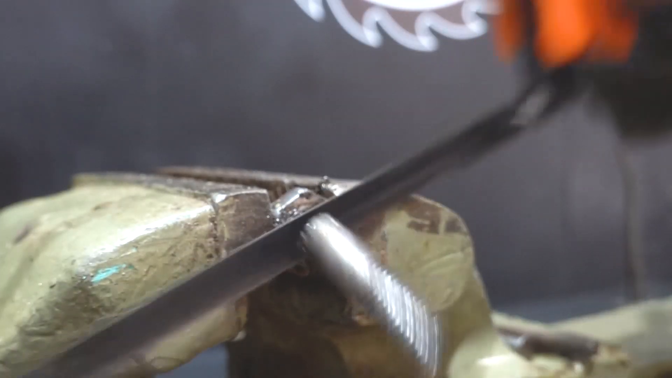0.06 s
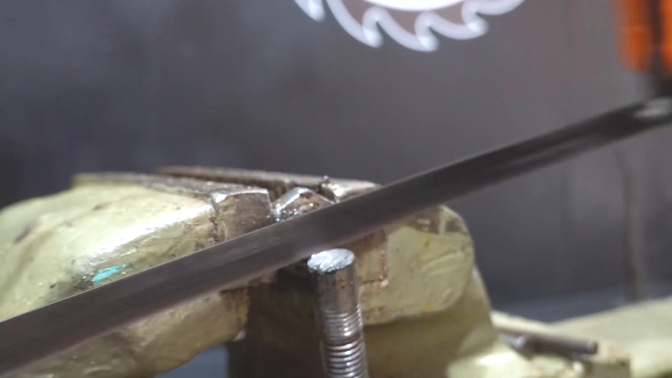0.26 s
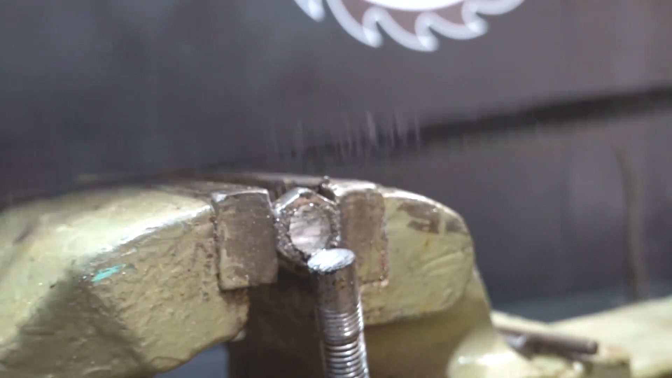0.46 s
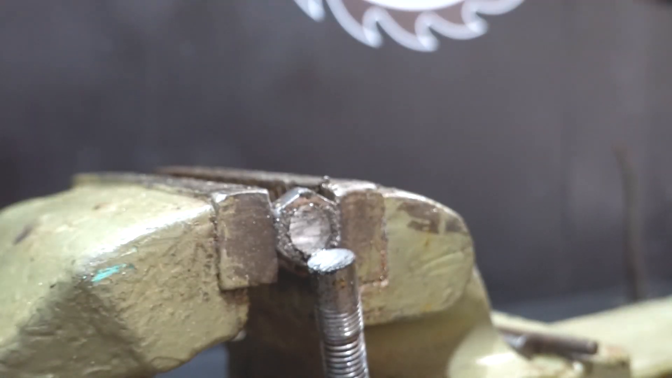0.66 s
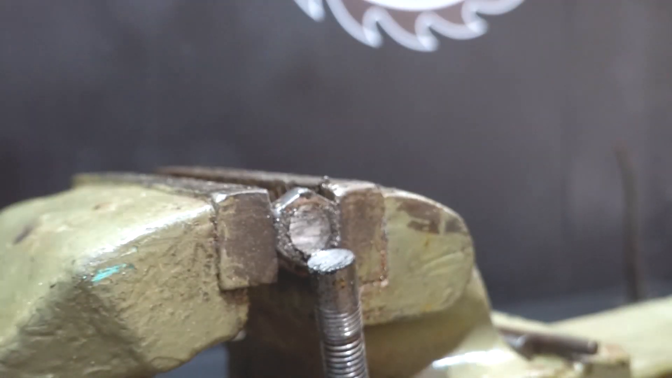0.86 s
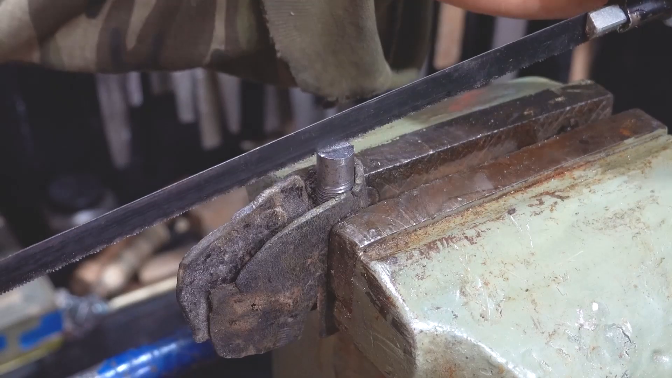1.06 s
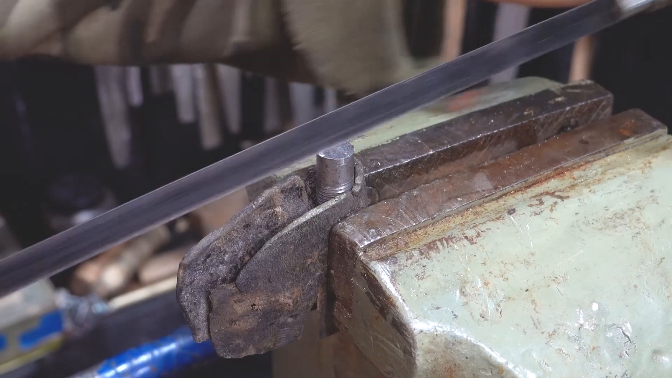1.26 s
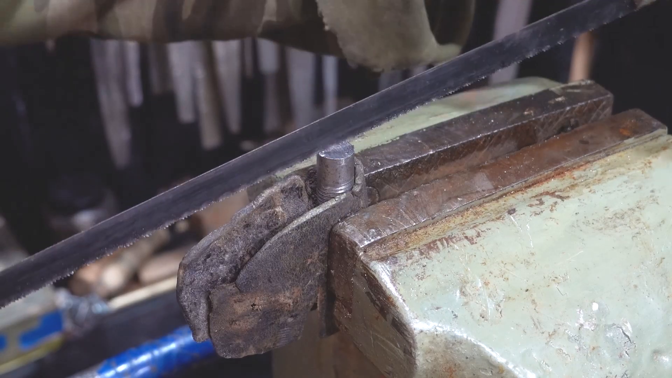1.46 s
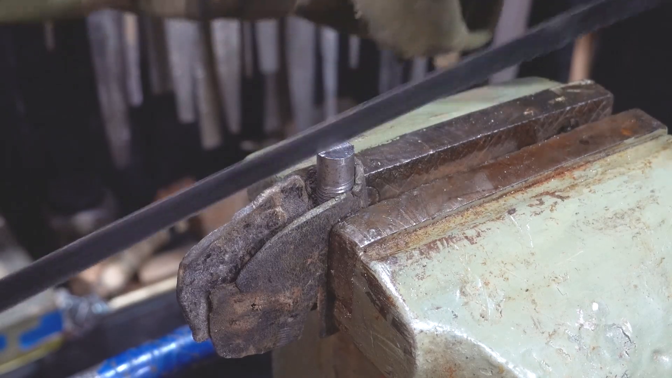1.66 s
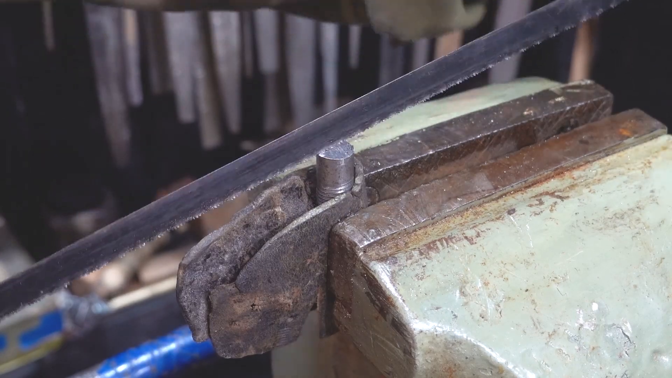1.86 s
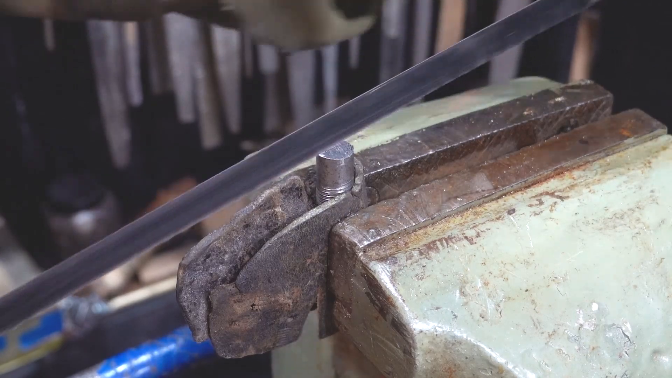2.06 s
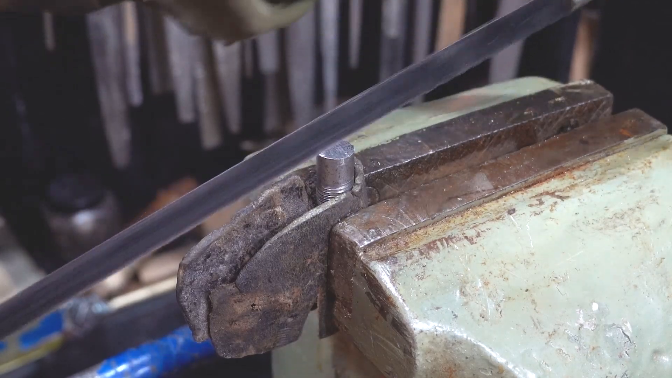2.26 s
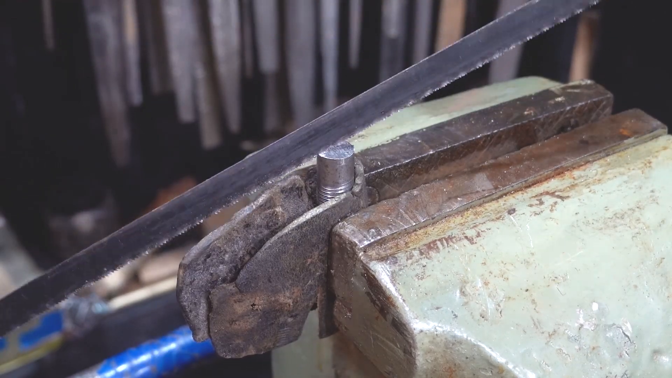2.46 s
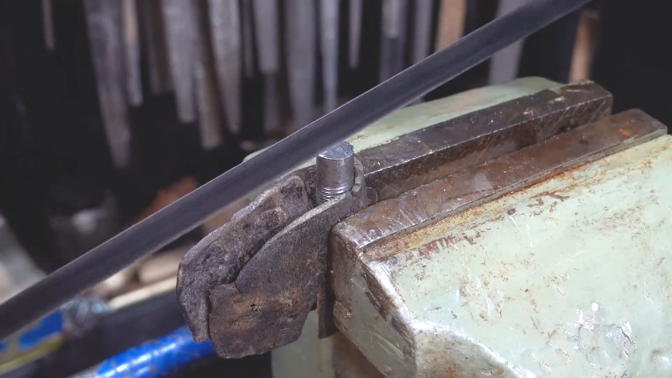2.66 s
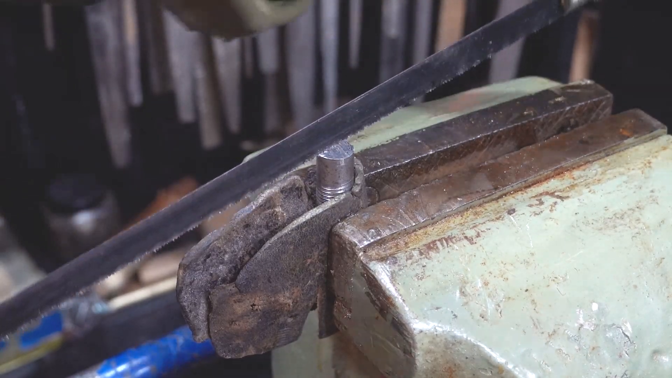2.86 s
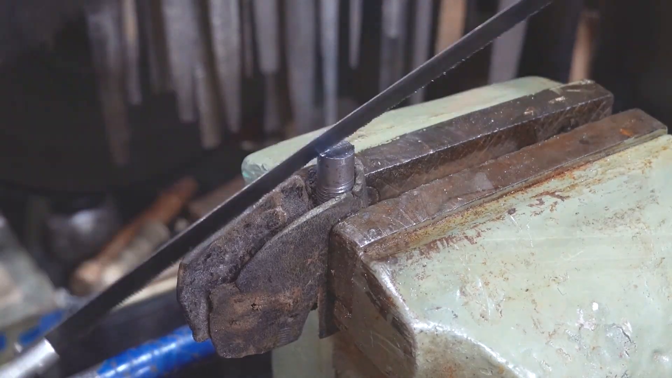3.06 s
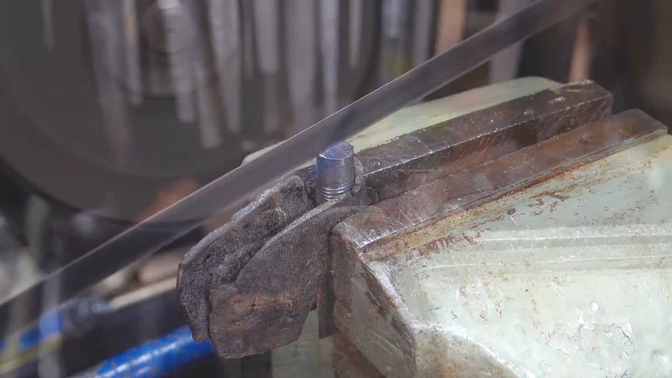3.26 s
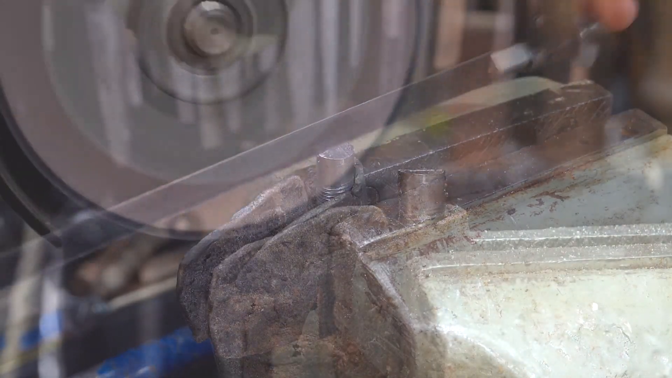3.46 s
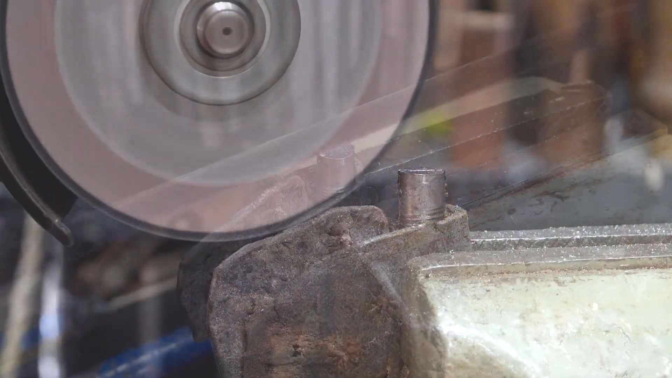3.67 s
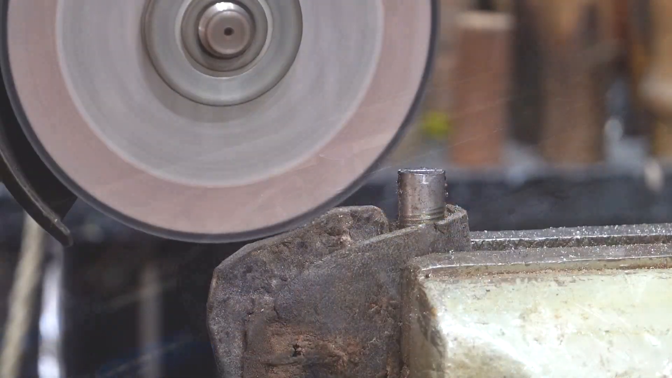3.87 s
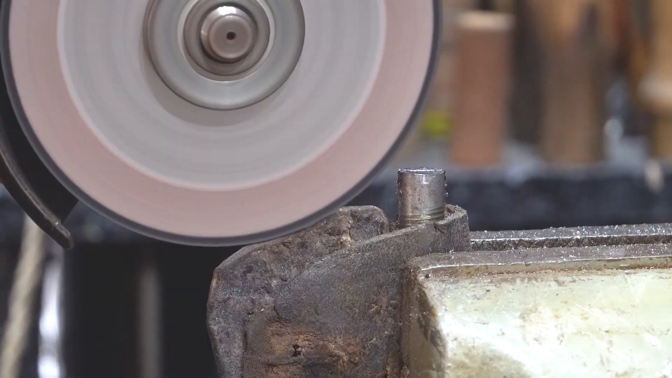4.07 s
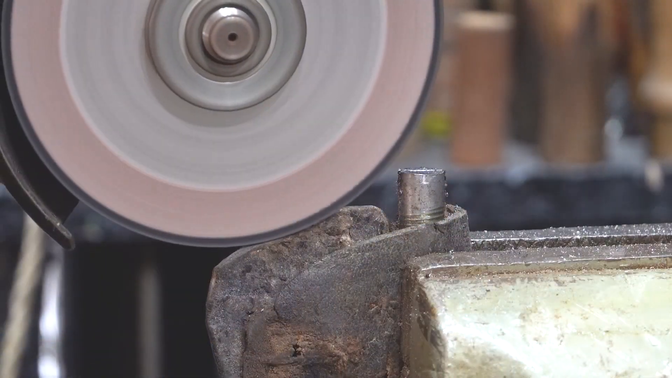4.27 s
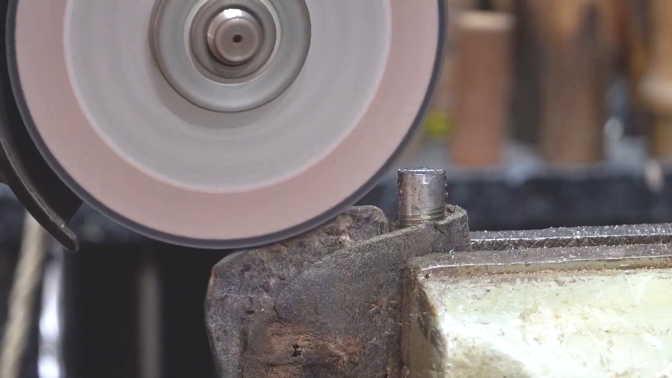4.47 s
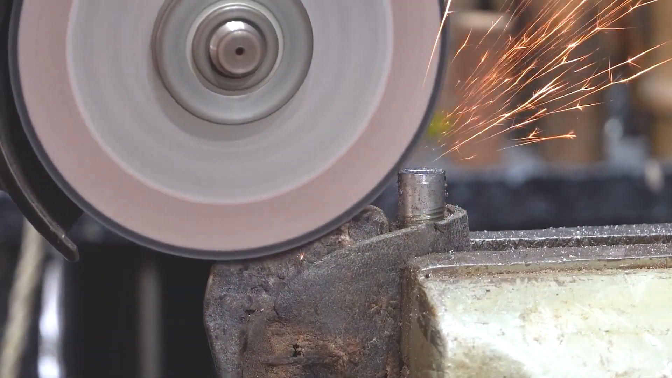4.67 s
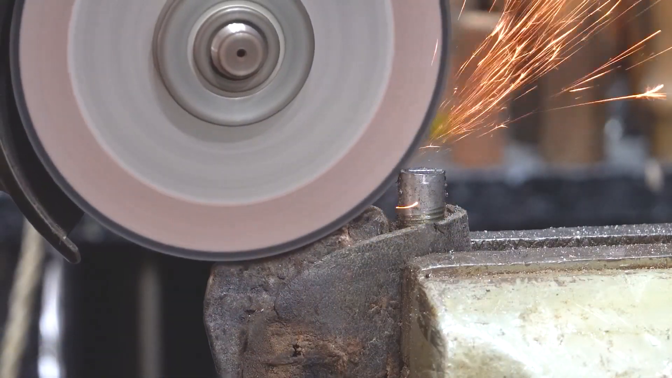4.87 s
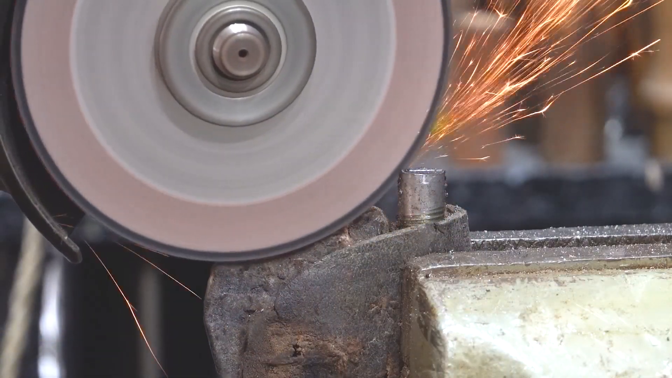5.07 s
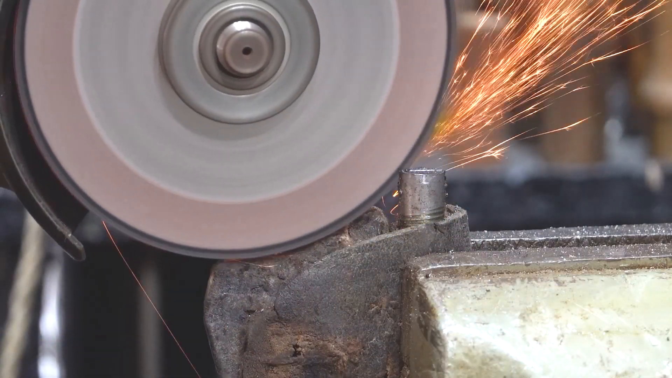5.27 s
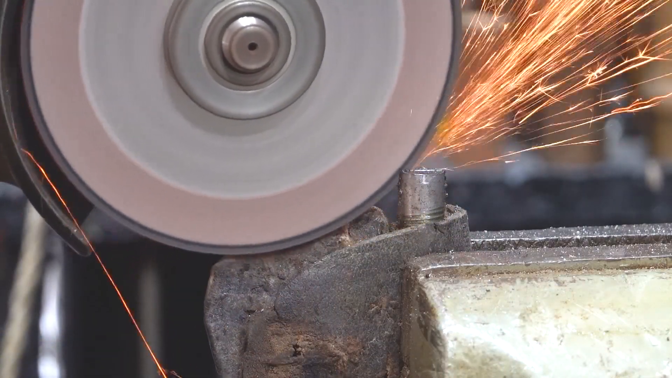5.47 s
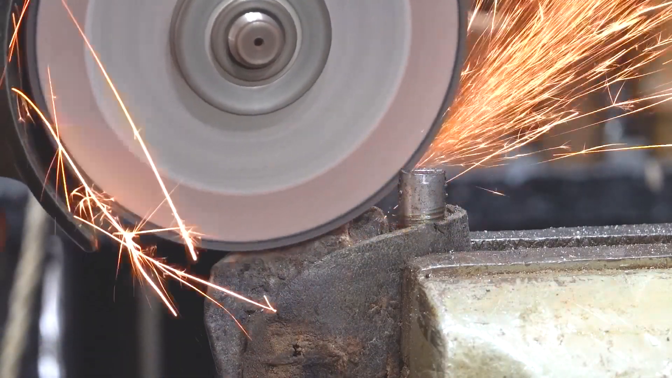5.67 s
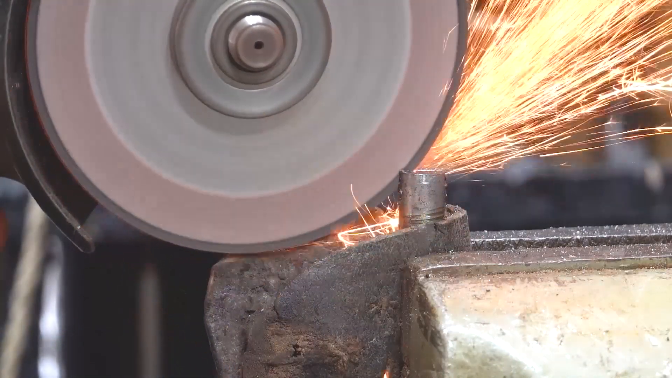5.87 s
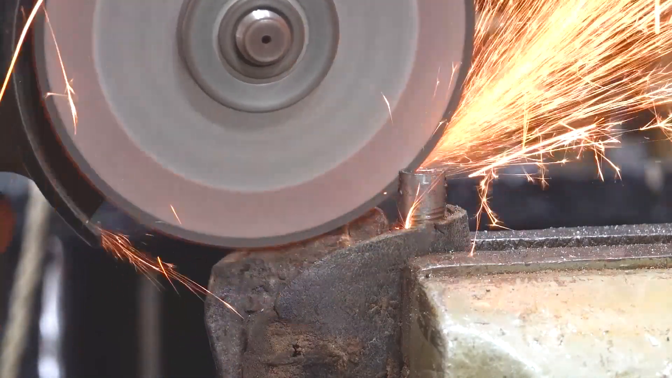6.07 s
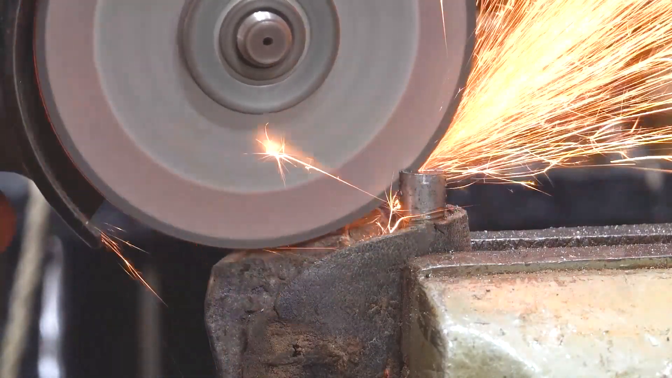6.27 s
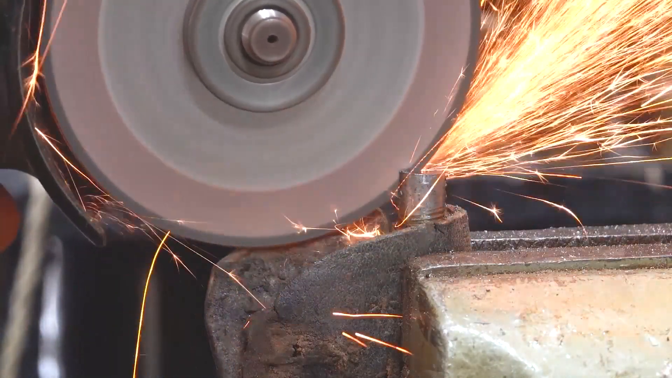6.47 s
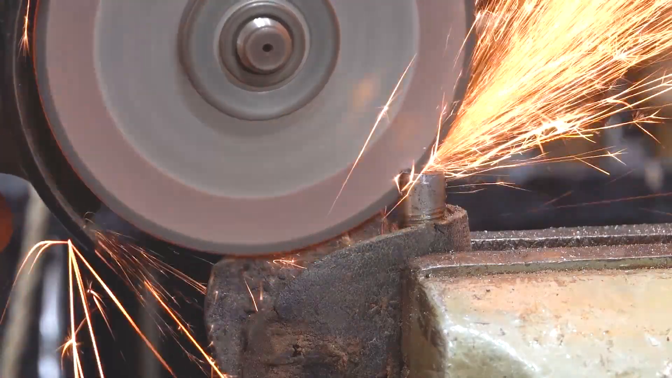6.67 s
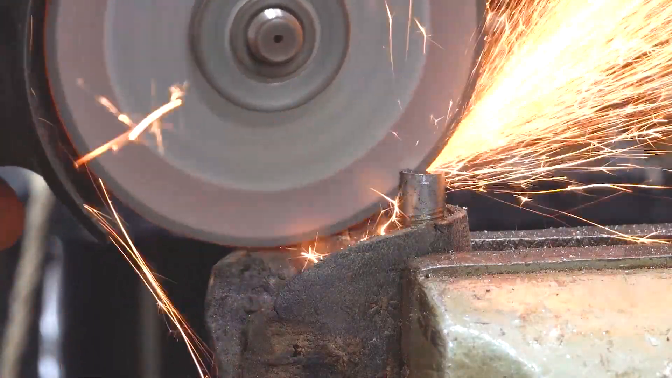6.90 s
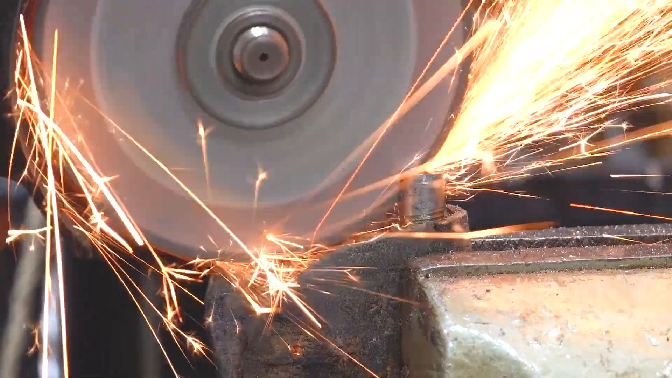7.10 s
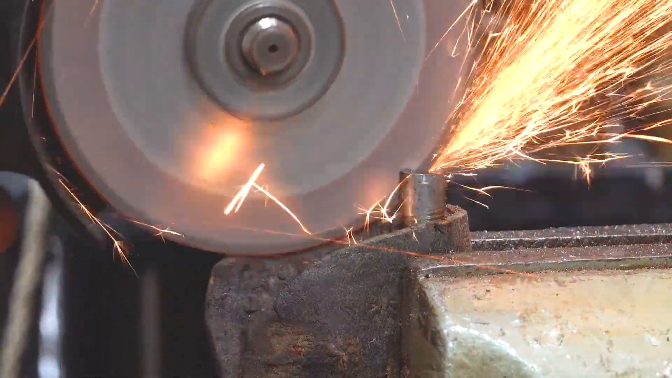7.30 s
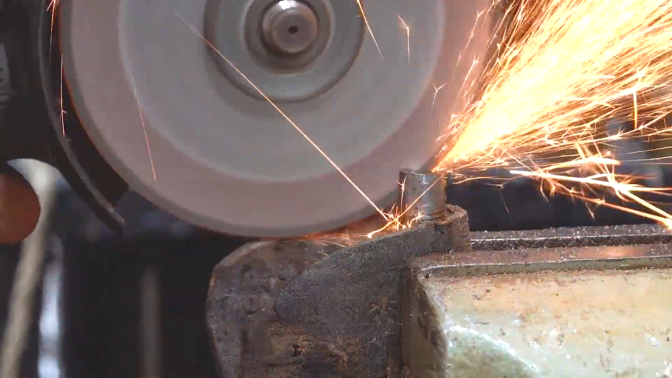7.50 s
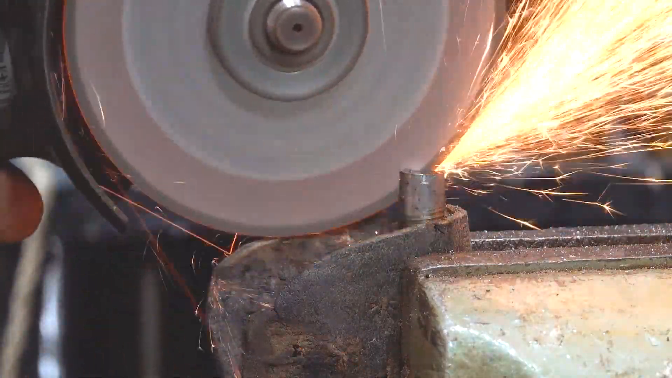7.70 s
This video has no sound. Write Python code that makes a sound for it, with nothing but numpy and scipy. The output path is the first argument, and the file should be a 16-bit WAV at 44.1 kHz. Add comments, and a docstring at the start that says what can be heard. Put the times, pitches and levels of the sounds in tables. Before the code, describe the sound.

Coarse hacksaw rasps finish one steel rod, quieter scraping strokes start another, then an angle grinder whirs and bites into steel with a harsh ringing screech.

```python
"""In a small workshop, close to the vice: a hacksaw finishes a steel rod, then starts on a second, shorter one.
Each stroke is a train of random tooth impacts that rings the modes of rod and vice; snags are single clicks.
An angle grinder takes over: motor tones and fan roar running free, then it bites into the steel, slows under
load and sings on multiples of its disc speed. Behind lie a low bench rumble, reverberation and still air."""
import sys
import numpy as np
from scipy import signal
from scipy.fft import rfft, irfft, next_fast_len
from scipy.io import wavfile
from scipy.ndimage import map_coordinates

SR = 44100
rng = np.random.default_rng(int(sys.argv[2]) if len(sys.argv) > 2 else 0)


def master(y):
    """Save y as 16-bit WAV."""
    cut = np.clip(np.atleast_2d(y).T, -1, 1)
    pcm = np.round(cut * 32767)  # scale
    wavfile.write(sys.argv[1], SR, pcm.astype(np.int16))


N = 341334

# In spectra and resonances level_db is relative: the shaped sound is brought to rms 1 afterwards.
# saw, teeth snagging and the frame knocking: start_s, level_db [dB, peak of the click], treble_db [dB, relative]
SNAG_CLICKS = [(0.2109, -40, -6), (0.2374, -27, -12), (0.2954, -38, -21), (0.4409, -47.5, -12),
               (0.621, -36.5, -17), (1.274, -50.5, -23), (1.293, -38, -32), (1.3149, -36, -31),
               (1.5773, -37.5, -15), (1.6921, -44.5, -15), (1.729, -35, -7.5), (1.8971, -62, -42),
               (1.9704, -40, -17), (2.0009, -27.5, -34), (2.0243, -27, -21), (2.0484, -29.5, -16),
               (2.1001, -41, -9), (2.3004, -56, -12), (2.3184, -59, -17), (2.3401, -29.5, -14),
               (2.6319, -45, -9), (2.6833, -41, -1), (2.7018, -39, -10), (2.9287, -42, -32),
               (2.9786, -49, -9), (3.0078, -33, -31), (3.242, -40.5, -3), (3.2695, -41, -18),
               (3.3119, -33, -16), (3.3373, -31, -10)]
# saw strokes on the long rod: start_s, level_s, release_s [s], start_db, level_db, release_db [dB],
# high_modes_db, treble_db [dB, relative]
LONG_ROD_STROKES = [(0, .075, .14, -36.5, -38, -43.5, -7, -9.5), (.21, .28, 0.34, -50, -39.5, -40, -10, -5),
                    (.36, .385, .41, -52, -50, -57, -5, -2), (.44, .455, .484, -67, -66.5, -71, -5.5, 7)]
# saw strokes on the short rod: the same columns, then vice_db, bench_db [dB, relative];
# release may come before the level point
SHORT_ROD_STROKES = [(1.268, 1.314, 1.37, -70, -53, -60, -2.5, -12.5, -4, -6.5),
                     (1.57, 1.581, 1.65, -61.5, -56.5, -81.5, -2, -15.5, -2.5, -17),
                     (1.682, 1.741, 1.732, -77, -45.5, -52, 0.5, -5.5, -2.5, -19),
                     (1.97, 2.002, 2.18, -66.5, -55.5, -64, 3.5, -6, -4.5, -9.5),
                     (2.312, 2.372, 2.465, -63, -44, -52, -2, -9, -6, -12.5),
                     (2.604, 2.644, 2.63, -74, -63, -68, -1, -5, -8, -6),
                     (2.68, 2.74, 2.818, -58, -51, -54, 3.5, -3, -8, -16),
                     (2.975, 3.042, 3.08, -53.5, -43.5, -46, -2, -7.5, -10, -26),
                     (3.306, 3.405, 3.494, -51.5, -47, -51, 1.5, -7.5, -17, -35)]
# what lingers after a stroke, rows for low modes, high modes, treble: under_release_db [dB], slope [dB per s]
LONG_ROD_TAILS = [(-13, -72), (-9, -74), (-26.5, -140)]
# the same, rows for low modes, high modes, treble, vice: under_release_db [dB], slope [dB per s]
SHORT_ROD_TAILS = [(-8.5, -75), (-12.5, -68), (-15.5, -80), (-9, -83)]
# modes of the long rod: pitch_hz [Hz], width_hz [Hz], level_db [dB]
LONG_ROD_MODES = [(510, 18, -26), (755, 45, -15), (1390, 26, -2.5), (1706, 63, 6), (1866, 300, -1),
                  (2010, 92, 1), (2635, 88, -12.5), (2923, 46, -0.5), (3370, 57, -11), (4380, 38, -12.5)]
# treble modes of the long rod: pitch_hz [Hz], width_hz [Hz], level_db [dB]
LONG_ROD_TREBLE = [(7100, 47, -6), (7580, 71, -2.5), (8460, 33, 2), (9350, 200, -5), (9780, 200, -8.5),
                   (9500, 36, -2.5)]
# modes of the short rod: pitch_hz [Hz], width_hz [Hz], level_db [dB]
SHORT_ROD_MODES = [(1514, 52, -17.5), (1854, 25, -1.5), (2231, 25, 1), (2672, 52, 4.5), (3150, 137, -6),
                   (3666, 157, -5), (4405, 180, -9), (5230, 360, -12)]
# treble modes of the short rod: pitch_hz [Hz], width_hz [Hz], level_db [dB]
SHORT_ROD_TREBLE = [(6366, 200, -5.5), (7000, 91, -2), (9300, 170, 13), (10710, 54, 14.5), (14500, 41, -10)]
# boom of the vice: pitch_hz [Hz], width_hz [Hz], level_db [dB]
VICE_MODES = [(749, 66, 19), (694, 47, -20), (787, 20, -21), (512, 30, 12.5)]
# saw frame ringing on: pitch_hz [Hz], level_db [dB, relative to the jolt], t60_s [s]
FRAME_MODES = [(716, -20, 1.3), (969, -20, 1.2), (1362, -3, .6), (1841, -6, .66), (2143, -16, .7),
               (2638, -4, .8), (3278, -10, .45), (3623, -18, .8)]
# scrape between the resonances: pitch_hz [Hz], level_db [dB per Hz]
SCRAPE_SPECTRUM = [(250, -38.5), (500, -7), (1200, -9.5), (2500, 5), (4500, -11.5), (6500, -25.5)]
# fine tooth hiss: pitch_hz [Hz], level_db [dB per Hz]
HISS_SPECTRUM = [(4000, -41.5), (6000, -7), (9000, 2.5), (12000, -2), (15800, -16.5)]
# grinder disc speed: time_s [s], speed [turns per s]
DISC_SPEED = [(3.52, 176.9), (4.0, 178.4), (4.7, 177.5), (5.3, 174.6), (5.65, 172.2), (6.5, 157.7),
              (6.74, 152.1), (6.92, 151.0), (7.04, 147.6), (7.14, 144.2), (7.22, 142.4), (7.3, 142.7),
              (7.46, 146.9), (7.56, 148.8), (7.74, 149.3)]
# motor tones: multiple [of the motor speed], level_db [dB, relative]
MOTOR_TONES = [(1.0, 0), (2.0, -11), (10.0, -8)]
# fan roar: pitch_hz [Hz], level_db [dB per Hz]
FAN_SPECTRUM = [(88, -89), (150, -35), (354, -19.5), (421, -24), (474, -14.5), (610, -12.5), (647, -13),
                (713, -13.5), (1010, -10), (1850, -6), (2300, 1.5), (3960, -7.5), (6450, -8.5), (8470, -14),
                (15800, -17)]
# grit tearing steel: pitch_hz [Hz], level_db [dB per Hz]
GRIT_SPECTRUM = [(400, -56.5), (800, -37), (1500, -30), (2500, -6), (3500, -7.5), (4300, -18), (5500, -14),
                 (8800, -3.5), (11700, -12.5), (14200, -8), (15800, -16)]
# high rings of the disc: pitch_hz [Hz], width_hz [Hz], level_db [dB]
DISC_SQUEAL = [(6840, 270, -16.5), (8300, 600, -13.5), (10800, 280, 2.5), (13200, 370, -4.5),
               (13840, 960, 3.5)]
# resonance of the pressed disc, picking out multiples of its speed: time_s [s], centre_hz [Hz],
# level_db [dB, all multiples together]
DISC_RESONANCE = [(4.2, 2680, -52), (4.6, 2660, -43), (4.72, 2460, -38), (5.0, 2460, -38), (5.3, 2500, -40),
                  (5.5, 2520, -41), (5.65, 2600, -41), (5.85, 2500, -39), (6.1, 2620, -39),
                  (6.4, 2650, -43), (6.62, 2620, -40), (6.8, 2520, -41), (7.0, 2530, -43), (7.2, 2540, -45),
                  (7.4, 2430, -41), (7.74, 2460, -41)]
# single multiples that stand out for a while: multiple [of the disc speed], start_s, end_s [s], level_db [dB]
SINGLE_TONES = [(13, 4.68, 5.1, -47), (6, 5.1, 5.75, -66), (4, 5.1, 5.7, -68), (10, 5.75, 6.3, -57),
                (7, 5.95, 6.65, -59), (19, 4.7, 5.7, -56), (11, 5.95, 7.0, -62), (5, 6.3, 7.8, -71),
                (12, 6.8, 7.8, -59), (10, 7.3, 7.65, -63)]
# course of the low rumble: time_s [s], level_db [dB]
BENCH_LEVEL = [(0, -66.5), (.35, -72.5), (.7, -82.5), (1.0, -80.5), (1.02, -71), (1.25, -74), (1.4, -69),
               (3.51, -62), (3.54, -82), (4.65, -83), (4.75, -95), (6.33, -102), (6.45, -84), (7.74, -92)]
# low rumble: pitch_hz [Hz], level_db [dB per Hz]
RUMBLE_SPECTRUM = [(12, -37.5), (20, 0.5), (60, -1.5), (97, 5), (123, -1), (134, 5.5), (171, -21),
                   (201, 2.5), (228, -4.5), (282, -8.5), (315, -14), (366, -4.5), (400, -10), (520, -22),
                   (880, -120)]
# bench resonances: pitch_hz [Hz], width_hz [Hz], level_db [dB]
BENCH_MODES = [(50.4, 36, -3), (71.4, 3.3, -9), (123.5, 4.6, 4.5), (198.6, 7.2, -3), (286.7, 13, -6.5)]
# reverberation of the shop: pitch_hz [Hz], t60_s [s]
SHOP_DECAY = [(200, 1), (1500, 0.53), (4000, 0.34), (10000, 0.16)]
# still air: pitch_hz [Hz], level_db [dB per Hz]
AIR_SPECTRUM = [(180, -33), (300, -30.5), (345, -24.5), (428, -13.5), (1280, -10.5), (2520, -9),
                (4400, -18.5), (12000, -30), (15600, -66.5), (22000, -120)]
# how far the two microphones hear the same: pitch_hz [Hz], likeness [0 to 1]
MICROPHONE_LIKENESS = [(60, 0.77), (180, 1.0), (550, 0.99), (1650, 0.96), (4970, 0.27), (15000, 0.43)]

FIRST_CUT_END_S, GRINDER_ON_S = 1.015, 3.522
LIFT_DB_PER_S = -480   # the teeth let go at this rate
BREAK_S, BREAK_DB = 0.46, -54   # the rod gives way and jolts the frame
GEAR_RATIO = 3.7   # motor turns per disc turn
TOUCH_S, CLOSE_S = 4.45, .3   # the rim touches and closes on the rod
DROP_S, DROP_LENGTH_S = 4.67, .03   # fan roar and motor tones drop abruptly
FAN_DB, FAN_DROPPED_DB, MOTOR_DB, MOTOR_DROPPED_DB = -40.5, -48.5, -51.5, -60.5   # before and after the drop
MOTOR_FADE_DB, MOTOR_FADE_S = -4.5, 0.65   # the motor tones sink further from the drop on
RING_DB, GRIT_DB = -55, -44.5
SING_WIDTH_HZ, SING_PATCHY_DB = 300, 4
BENCH_LAG_S, BENCH_SWAY_S = 0.071, 0.053   # the bench rocks after a stroke's level point, for about this long
AIR_DB, CUTOFF_HZ = -82, 15800


def first_cut():
    """The saw on the long rod: tooth blows ring its modes; the frame rings on after the rod gives way."""
    blows = teeth(per_s=1500, spread_db=2.5, lumpy_db=1.0)
    body, top = snags(0, 1)
    low, high, treble = strokes(LONG_ROD_STROKES, LONG_ROD_TAILS)
    drive = low * blows + from_db(3.0) * body
    upper = high * blows + from_db(-0.5) * body
    fine = treble * from_db(-4.5) * blows + from_db(7.0) * top
    out = sawn(drive, upper, LONG_ROD_MODES, 2300, SCRAPE_SPECTRUM, smooth_db=-7.5)
    out += sawn(fine, fine, LONG_ROD_TREBLE, 8000, HISS_SPECTRUM, smooth_db=-6.0)
    return (out + frame()) * (np.arange(N) < FIRST_CUT_END_S * SR)


def frame():
    """One jolt sets the modes of the saw frame ringing, each a decaying sine."""
    jolt = from_db(BREAK_DB) * (np.arange(N) == round(BREAK_S * SR))
    out = np.zeros(N)
    for hz, db, t60 in FRAME_MODES:
        r = from_db(-60 / (t60 * SR))   # decay per sample
        w = 2 * np.pi * hz / SR
        out += from_db(db) * signal.lfilter([0, np.sin(w)], [1, -2 * r * np.cos(w), r * r], jolt)
    return out


def second_cut():
    """The saw on the short rod: tooth blows ring its modes and the vice booms along."""
    blows = teeth(per_s=1800, spread_db=1.0, lumpy_db=1.0) * (np.arange(N) < GRINDER_ON_S * SR)
    body, top = snags(1, 4)
    low, high, treble, vice = strokes(SHORT_ROD_STROKES, SHORT_ROD_TAILS)
    drive = low * blows + from_db(1.5) * body
    upper = high * blows + from_db(6.5) * body
    boom = vice * from_db(4) * blows
    fine = treble * from_db(-3.5) * blows + from_db(5.0) * top
    out = sawn(drive, upper, SHORT_ROD_MODES, 2950, SCRAPE_SPECTRUM, smooth_db=-10)
    out += np.std(boom) * resonances(boom, VICE_MODES, patchy_db=3.5)
    return out + sawn(fine, fine, SHORT_ROD_TREBLE, 8000, HISS_SPECTRUM, smooth_db=-3.5)


def teeth(per_s, spread_db, lumpy_db):
    """Tooth impacts at random moments, of uneven size and either sign, in lumps; rms 1."""
    sizes = from_db(spread_db * np.minimum(rng.exponential(1, N), 3)) * rng.choice([-1, 1], N)
    hits = rng.random(N) < per_s / SR
    return rms_one(sizes * hits * from_db(lumpy_db * drift(40)))


def snags(low_s, high_s):
    """Click trains of the snags between two times: body and treble."""
    body, top = np.zeros((2, N))
    for s, db, treble_db in SNAG_CLICKS:
        if low_s < s < high_s:
            at = round(s * SR)
            body[at], top[at] = from_db(db), from_db(db + treble_db)
    return body, top


def strokes(rows, tails):
    """Gains of the layers: the teeth catch, move through the set levels and let go, leaving a fainter tail."""
    t, out = np.arange(N) / SR, np.zeros((len(tails), N))
    tail_db, tail_db_per_s = np.transpose(tails)[:, :, None]
    for start, level, release, start_db, level_db, release_db, *shares_db in rows:
        at = slice(round(start * SR), round((release + 1) * SR))
        after = np.maximum(t[at] - release, 0)
        push_db = np.interp(t[at], [start, level, release], [start_db, level_db, release_db])
        layer_db = np.c_[[0, *shares_db][:len(tails)]]   # the low modes are the reference
        fall_db = np.maximum(LIFT_DB_PER_S * after, tail_db + tail_db_per_s * after)
        out[:, at] += from_db(push_db + layer_db + fall_db)
    return out


def sawn(low, high, peaks, split_hz, smooth, smooth_db):
    """The blows ring low and high modes in changing shares and leave a broad scrape between them."""
    low_peaks = [p for p in peaks if p[0] < split_hz]
    high_peaks = [p for p in peaks if p[0] >= split_hz]
    out = from_db(smooth_db) * np.std(low + high) * coloured(low + high, smooth)
    out += np.std(low) * resonances(low, low_peaks, patchy_db=2.5)
    return out + np.std(high) * resonances(high, high_peaks, patchy_db=3.0)


def grinder():
    """Fan roar, gear tones, the song of the cut and the grit tearing steel."""
    t, speed = np.arange(N) / SR, in_time(DISC_SPEED)[0]
    turns = np.cumsum(speed) / SR
    bite = np.clip((t - TOUCH_S) / CLOSE_S, 0, 1) ** 2
    drop = np.clip((t - DROP_S) / DROP_LENGTH_S, 0, 1)
    sources = fan(bite, drop) + motor(turns, drop) + bite * cut(turns) + song(turns, speed)
    return sources * (t > GRINDER_ON_S)


def fan(bite, drop):
    """Fan roar: dense random impulses through a broad spectrum; dips slightly at the bite, then drops abruptly."""
    level_db = FAN_DB + (FAN_DROPPED_DB - FAN_DB) * drop - 2.6 * bite + 1.2 * drift(12.0)
    return from_db(level_db) * coloured(teeth(per_s=9000, spread_db=3.0, lumpy_db=0.03), FAN_SPECTRUM)


def motor(turns, drop):
    """Gear whine: sines on multiples of the motor speed, and the motor beating against the disc."""
    t = np.arange(N) / SR
    tones = sum(from_db(db + 1.2 * drift(10)) * np.sin(2 * np.pi * k * GEAR_RATIO * turns)
                for k, db in MOTOR_TONES)
    beat_db = -9.5 - 13 * drop + 0.76 * drift(4.5)
    beat = from_db(beat_db) * np.sin(2 * np.pi * (GEAR_RATIO - 1) * turns)
    level_db = MOTOR_DB + (MOTOR_DROPPED_DB - MOTOR_DB) * drop
    level_db = level_db + MOTOR_FADE_DB * np.clip((t - DROP_S) / MOTOR_FADE_S, 0, 1)
    return from_db(level_db) * (tones + beat)


def cut(turns):
    """Rim roughness and random grains strike the steel, exciting rings, a tearing hiss and squeal."""
    grains = teeth(per_s=9000, spread_db=2.0, lumpy_db=.8)
    contact = rms_one(rim(turns, wear=.1, patchy_db=3.5) + from_db(-2) * grains)
    contact = contact * (1 + 0.033 * np.cos(2 * np.pi * turns))   # the disc runs out of true
    ring = resonances(contact, [(2630, 250, -6), (3314, 30, 0.0), (1790, 75, -9)], patchy_db=4.5)
    squeal = resonances(contact, DISC_SQUEAL, patchy_db=4.0)
    grit = coloured(contact, GRIT_SPECTRUM) + from_db(-11.5) * squeal
    return from_db(RING_DB) * ring + from_db(GRIT_DB) * grit


def rim(turns, wear, patchy_db, count=256):
    """The roughness of the rim passes once a turn and wears into a new pattern, some grain sizes standing out."""
    rows = int(turns[-1]) + 3
    pattern = signal.lfilter([1], [1, wear - 1], rng.standard_normal((rows, count)), axis=0)
    where = np.meshgrid(np.arange(rows) / 45, np.arange(count // 2 + 1) / 4, indexing="ij")
    patches = map_coordinates(rng.standard_normal((40, 40)), where, order=1)   # by turn and grain size
    pattern = irfft(rfft(pattern) * from_db(patchy_db * patches))
    return rms_one(map_coordinates(pattern, [turns, turns % 1 * count], order=3, mode="grid-wrap"))


def song(turns, speed):
    """Multiples near the resonance sing steadily, farther ones come and go, single ones stand out for a while."""
    t, angle = np.arange(N) / SR, 2 * np.pi * turns + 0.015 * drift(30)
    centre_hz, level_db = in_time(DISC_RESONANCE)
    out, power = 0, 0
    for k in range(12, 24):
        off = 2 * (k * speed - centre_hz) / SING_WIDTH_HZ   # distance in half widths
        near = 1 / (1 + off ** 2)
        gain = near * from_db(SING_PATCHY_DB * (1 - near) * drift(1.0))
        out = out + gain * np.sin(k * angle - 2 * np.arctan(off) + rng.uniform(0, 3.7))
        power = power + near ** 2
    out = out / np.sqrt(power) * from_db(level_db) * (t > DISC_RESONANCE[0][0])
    for k, start, end, db in SINGLE_TONES:
        fade = np.clip(np.minimum(t - start, end - t) / .08, 0, 1)
        out += fade * from_db(db + 2 * drift(5)) * np.sin(k * angle)
    uneven = 0.25 * np.clip(t - 5.8, 0, 1)   # late in the cut, from 5.8 s, alternate turns differ
    return out * (1 + uneven * np.cos(np.pi * turns))


def bench():
    """Low rumble of shaped noise and resonances, swelling as each push on the short rod rocks the bench."""
    t, push = np.arange(N) / SR, rng.standard_normal(N)
    rocks = np.zeros(N)
    for row in SHORT_ROD_STROKES:
        level_s, level_db, bench_db = row[1], row[4], row[-1]
        sway = np.exp(-.5 * ((t - level_s - BENCH_LAG_S) / BENCH_SWAY_S) ** 2)
        rocks += from_db(level_db + bench_db) * sway
    level = from_db(in_time(BENCH_LEVEL)[0]) + rocks * (t < GRINDER_ON_S)
    ring = resonances(push, BENCH_MODES, patchy_db=4.5)
    return level * rms_one(coloured(push, RUMBLE_SPECTRUM) + from_db(2.0) * ring)


def shop(x):
    """Reverberation: noise that dies faster in the treble, its own in each channel towards the treble."""
    t, tail = np.arange(SR) / SR, 0
    for hz in 125 * 2. ** np.arange(7):
        band = signal.butter(2, [hz / np.sqrt(2), hz * np.sqrt(2)], "band", fs=SR, output="sos")
        mid, side = signal.sosfilt(band, rng.standard_normal((2, SR)))
        apart = min(hz / 2500, 1)   # long waves reach both microphones alike
        decay = from_db(-60 * t / at_hz(SHOP_DECAY, hz))
        tail = tail + (mid + apart * side * np.array([[1], [-1]])) * decay
    tail = tail * np.minimum(t / 0.016, 1)   # builds up over 16 ms
    return signal.fftconvolve(x[None], tail / np.sqrt(np.sum(tail ** 2) / 2), axes=1)[:, :N]


def still_air():
    """Shaped noise, separate in each channel, 12 dB fainter during the first cut."""
    level_db = AIR_DB - 12 * (np.arange(N) < FIRST_CUT_END_S * SR)
    return from_db(level_db) * coloured(rng.standard_normal((2, N)), AIR_SPECTRUM)


def widened(x, step_hz):
    """Two microphones: a late phase-scrambled copy, opposite in each, parts them mostly in the treble."""
    size = next_fast_len(N)
    hz, knots = np.fft.rfftfreq(size, 1 / SR), np.arange(0, SR, step_hz)
    alike = np.clip(at_hz(MICROPHONE_LIKENESS, hz), 0, 1)
    phase = -np.cumsum(rng.uniform(0, 2 * np.pi, len(knots)))   # falling phase makes the copy late
    turn = np.exp(1j * np.interp(hz, knots, phase))
    shared, parted = np.sqrt((1 + alike) / 2), np.sqrt((1 - alike) / 2) * turn
    return irfft(rfft(x, size) * (shared + parted * [[1], [-1]]), size)[:, :N]


def resonances(x, peaks, patchy_db):
    """Parallel (Hz, width, dB) resonances, signs alternating, each waxing and waning; rms 1."""
    out = 0
    for k, (hz, width, db) in enumerate(peaks):
        r = np.exp(-np.pi * width / SR)
        pole = [1, -2 * r * np.cos(2 * np.pi * hz / SR), r * r]
        gain = (-1) ** k * from_db(db + patchy_db * drift(8.4)) * (1 - r * r) / 2
        out = out + signal.lfilter([1, 0, -1], pole, gain * x + 1e-18)
    return rms_one(out)


def coloured(x, spectrum):
    """Shapes x by (Hz, dB) points; rms 1."""
    size = next_fast_len(N)
    gain = from_db(at_hz(spectrum, np.fft.rfftfreq(size, 1 / SR)))
    return rms_one(irfft(rfft(x, size) * gain, size)[..., :N])


def drift(rate):
    """Random wander with spread 1, from 60 steps a second; a higher rate forgets sooner."""
    steps = rng.standard_normal(int(N / SR * 60) + 9)
    r = np.exp(-rate / 10)
    wander = rms_one(signal.lfilter([1], [1, -r], steps))
    return np.interp(np.arange(N) * 60 / SR, np.arange(len(steps)), wander)


def in_time(rows):
    """Columns of a curve table at every sample."""
    s, *columns = np.transpose(rows)
    return [np.interp(np.arange(N) / SR, s, c) for c in columns]


def at_hz(points, hz):
    """A spectrum read on a log-frequency axis."""
    point_hz, values = np.transpose(points)
    return np.interp(np.log(hz + 1), np.log(point_hz), values)


def from_db(db):
    """Decibels to amplitude."""
    return 10 ** (np.asarray(db) / 20)


def rms_one(x):
    """Scales x to rms 1."""
    return x / np.sqrt(np.mean(x ** 2) + 1e-20)


def scene():
    """All sources before the microphones and set in the shop; the second cut lies a little to the left."""
    first, second, tool = first_cut(), second_cut(), grinder()
    close = widened(first, step_hz=149) + widened(tool, step_hz=25)
    close = close + widened(second, step_hz=154) * from_db([[1.6], [-1.6]])
    reverberation = from_db(-14.5) * shop(first + second) + from_db(-16) * shop(tool)
    return close + reverberation + bench() + still_air()


def record(dry):
    """The top is cut steeply."""
    return signal.sosfilt(signal.ellip(12, .5, 75, CUTOFF_HZ, fs=SR, output="sos"), dry)


dry = scene()
out = record(dry)
master(out)
```